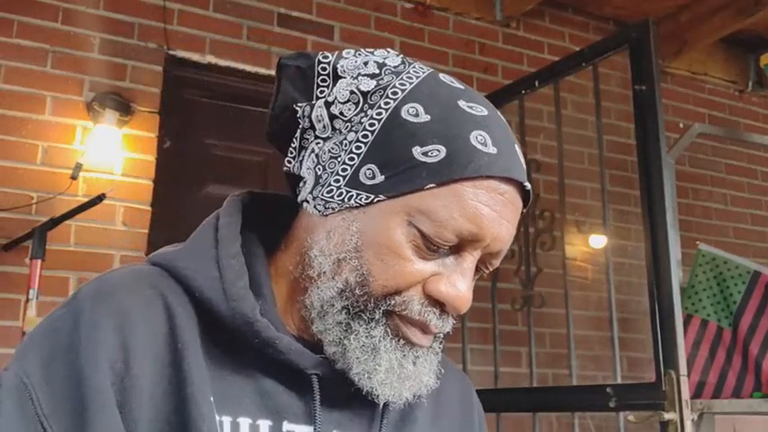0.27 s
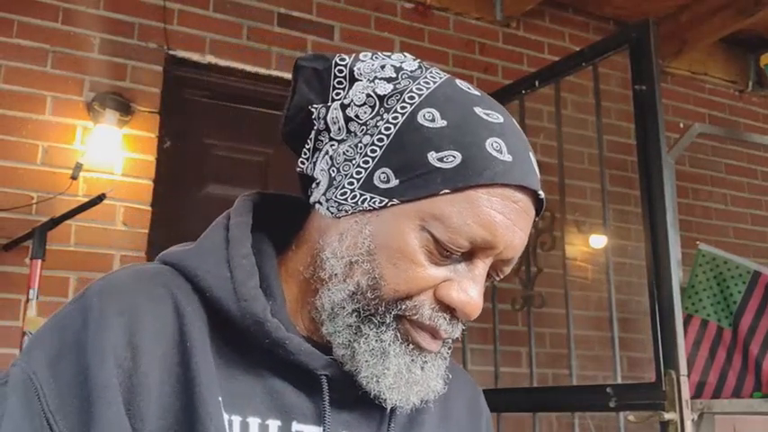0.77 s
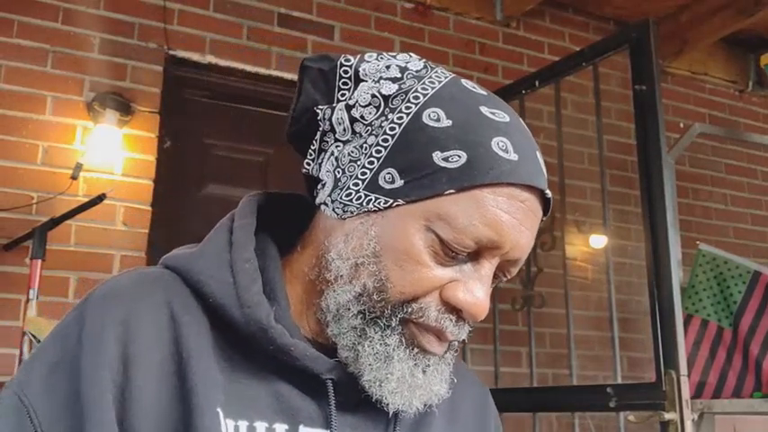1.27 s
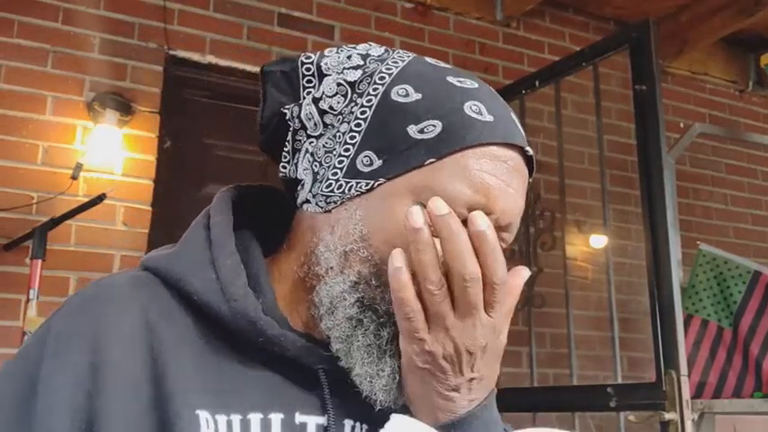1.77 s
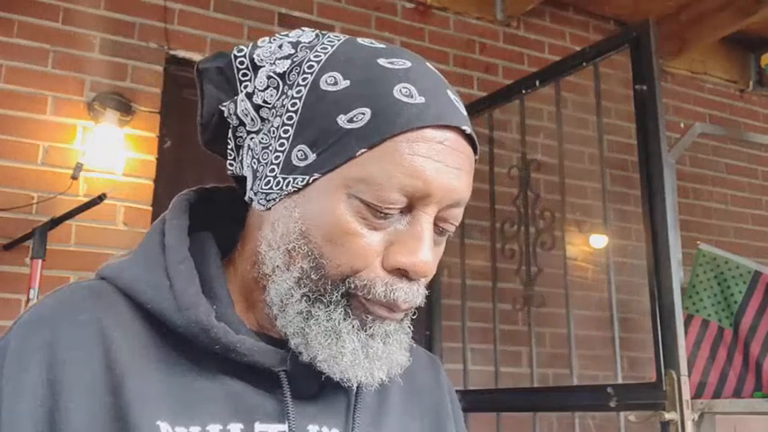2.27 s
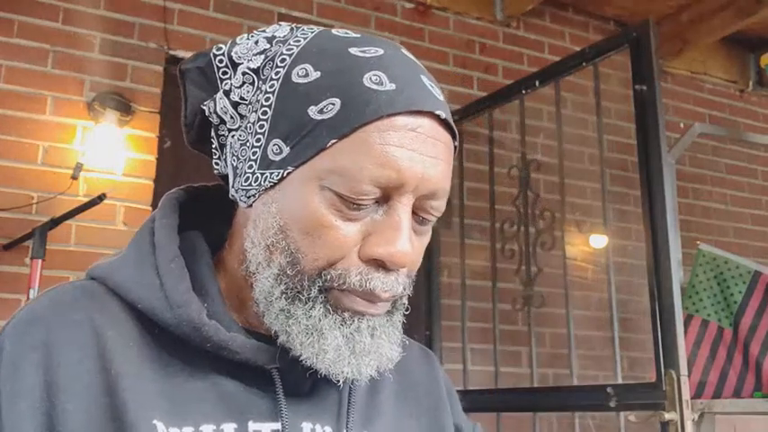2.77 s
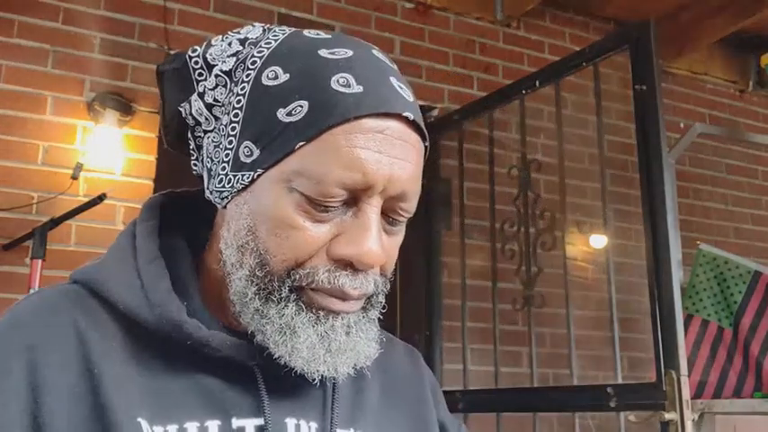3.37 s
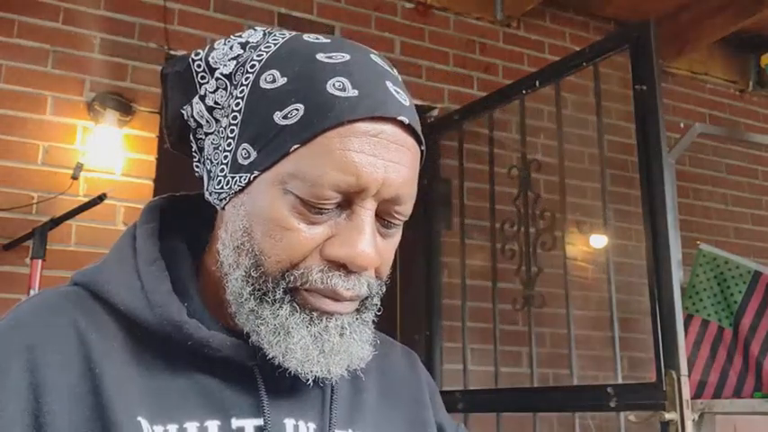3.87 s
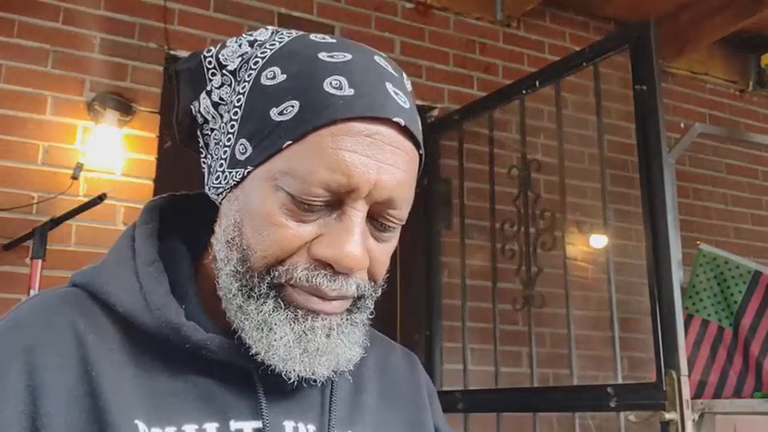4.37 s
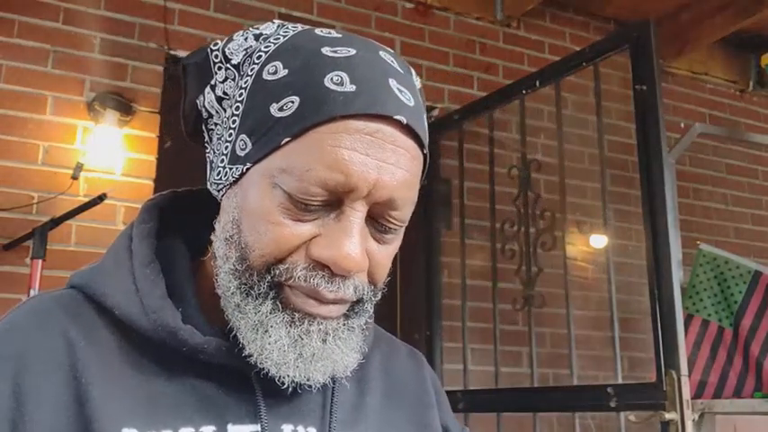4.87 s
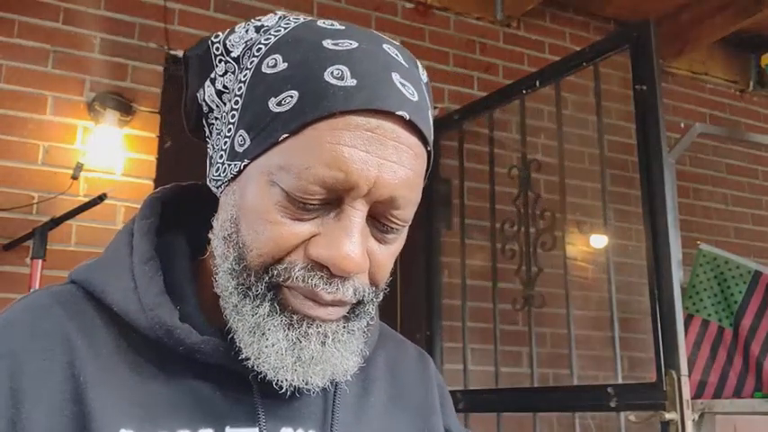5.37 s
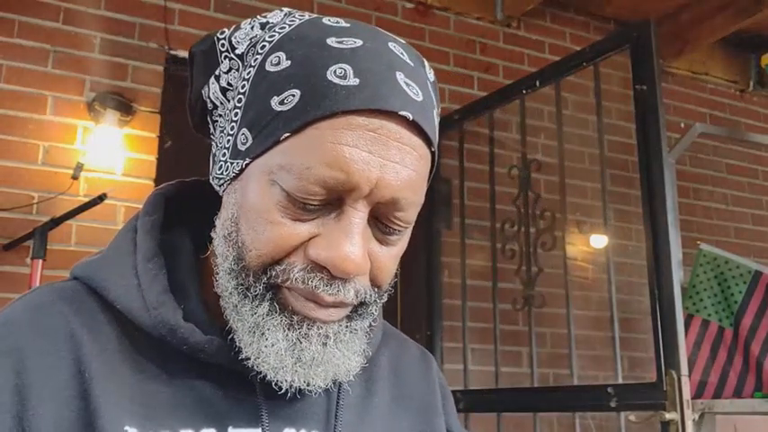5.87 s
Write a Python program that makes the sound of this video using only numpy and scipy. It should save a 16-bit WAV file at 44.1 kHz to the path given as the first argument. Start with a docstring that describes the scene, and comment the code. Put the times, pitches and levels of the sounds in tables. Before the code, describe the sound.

Close to a phone microphone on a brick porch, hard tablets clatter in a small plastic bottle in three quick bursts, then spill out in a loud scrabbling shake. After a pause, the bottle is snapped, knocked and thumped, hollow and plasticky, with one more firm tap cluster before it fades to faint contacts. A quiet traffic rumble and hiss lie underneath.

```python
"""Tablets are shaken about in a small plastic bottle and tipped into a hand; the bottle is then tapped and
knocked about. Single knocks, rough contacts that ring the bottle, stand out of showers of tiny collisions;
the air in the bottle hums along, and hard plastic adds damped pings and soft hollow thumps.
A brick porch adds a short echo of decaying noise, over a quiet outdoor hum of shaped noise and a faint whine;
a phone close by overloads on the sharpest clicks."""
import sys
import numpy as np
from scipy import signal
from scipy.fft import rfft, irfft
from scipy.io import wavfile
from scipy.ndimage import uniform_filter1d

SR = 44100
rng = np.random.default_rng(int(sys.argv[2]) if len(sys.argv) > 2 else 0)


def store_wav(level_fs):
    """Save 16-bit WAV to argv[1]."""
    pcm = np.round(np.clip(np.atleast_2d(level_fs), -1, 1) * 32767)
    wavfile.write(sys.argv[1], SR, pcm.T.astype(np.int16))


N = 269495
TIME = np.arange(N) / SR  # s

# resonances of bottle and tablets, in order thud, base, wall, neck, two of the tablets:
# pitch_hz, nominal width_hz, level_db in a knock, closed_change_db once the bottle is closed
RESONANCES = [(434, 443, -2, 3.5), (1011, 225, -7, -3), (1596, 703, -0.5, 1.5), (2887, 334, -3.5, -3.5),
              (4480, 890, 0.5, 1), (6000, 1310, 1, 1.5)]
# single knocks of tablets and bottle: start_s, level_db, hardness (0 a padded thud, 1 tablet on tablet)
KNOCK_EVENTS = [(0.0893, -22, 1.2), (.094, -19, 1.2), (0.1033, -7, 1.02), (0.1165, -12.5, 0.81),
                (0.1193, -12, 0.83), (.1273, -12, 1), (.151, -16.5, 1.02), (0.1652, -16.5, .7),
                (0.2015, -25, 0.63), (.209, -27.5, 0.66), (0.3618, -45, 1.08), (0.55, -21.5, 1.21),
                (0.5643, -18, 0.84), (0.5704, -12, 0.87), (0.7214, -27, 0.86), (.737, -15.5, 0.98),
                (0.7482, -21.5, 0.72), (1.395, -20, .6), (1.4328, -9.5, .78), (1.4944, -20.5, 0.6),
                (1.512, -29, 0.81), (1.561, -25.5, 0.66), (1.6139, -25, 0.57), (1.6421, -12.5, 0.71),
                (1.7265, -30, 0.53), (1.7602, -40, 0.14), (1.813, -29, 0.72), (2.3594, -32.5, 0.061),
                (2.447, -35, 0.14), (2.7686, -14.5, 1.09), (2.7832, -14, 0.6), (2.8445, -43, 1),
                (2.883, -15, .95), (2.8915, -14.5, 0.9), (3.0111, -36, .95), (3.039, -14, 0.72),
                (3.197, -32, 0.23), (3.523, -29, 0.2), (3.564, -32.5, 0.32), (3.777, -35.5, 0.76),
                (4.126, -24.5, 0.96), (4.1403, -14, 0.39), (4.1541, -16, 0.49), (4.173, -19.5, 0.2),
                (4.3018, -33, 1.06), (4.3578, -24.5, .22), (4.584, -40.5, 0.34), (4.789, -44, 0.67),
                (5.0012, -38, 0.54), (5.3973, -28, 0.91), (5.411, -51, .5)]

# once the tablets are out the bottle is closed, and bare plastic adds more treble
CLOSED_S, CLOSED_TREBLE_DB = 2.2, 5
SNAP_HZ = 8500  # pitch that stands for the bright treble of a contact


def knocks(contact_s=.00065, soft_stretch=0.37, snap_db=-5.0):
    """Each knock is a brief rough contact; hardness and a random landing set how hard each resonance rings."""
    landing_spread_db = 1.5
    out, t = np.zeros(N), TIME[:SR // 30]
    attack = t < .004
    for start_s, level_db, hardness in KNOCK_EVENTS:
        push_s = contact_s * np.exp(soft_stretch * (1 - hardness))  # a softer contact lasts longer
        # the thin plastic gives way, so the force builds before it dies
        force = t / push_s * np.exp(-t / push_s)
        closed = start_s > CLOSED_S
        sound = np.zeros(len(t))
        for hz, width_hz, ring_db, closed_db in RESONANCES:
            contact = rng.standard_normal(len(t)) * force
            pitch_hz = hz * np.exp(.03 * rng.standard_normal())
            # a core and a wider skirt
            mode = ring(contact, pitch_hz, width_hz) + ring(contact, pitch_hz, 1.6 * width_hz)
            mode_db = ring_db + closed * closed_db + push_db(hardness, hz)
            mode_db += landing_spread_db * rng.standard_normal()
            sound += undb(mode_db) * mode / np.std(mode[attack])
        # the hard edge of a tablet adds a bright snap
        snap = fizz(rng.standard_normal(len(t)) * force)
        bright_db = snap_db + closed * CLOSED_TREBLE_DB + push_db(hardness, SNAP_HZ)
        sound += undb(bright_db) * snap / np.std(snap[attack])
        add(out, start_s - push_s, undb(level_db) * sound)  # the force peaks at start_s
    return out


def push_db(hardness, hz):
    """A contact pushes hardest at a pitch set by its hardness, and less for each octave away from it."""
    soft_hz, hard_hz = 424, 6900  # strongest pitch at hardness 0 and 1
    below_db_per_oct, above_db_per_oct = 8, 11
    octaves = np.log2(hz / soft_hz) - hardness * np.log2(hard_hz / soft_hz)
    return min(below_db_per_oct * octaves, -above_db_per_oct * octaves)


def slides(per_second=1600, spread_db=2.0, rub=0.25, thud_db=-10, thud_follow=0.94, base_db=-11,
           neck_db=-5, low_tablet_db=-8, high_tablet_db=-2, fizz_db=-8.5):
    """Tablets slide and fingers rub: showers of tiny random collisions, over a steady rub, swell and die away."""
    # tablets sliding, fingers rubbing on plastic: peak_s, fall_s, level_db, walls_db (share of the walls)
    slide_events = [(.002, 0.0093, -20, -10), (0.137, 0.084, -25, -2.5), (0.176, 0.068, -22.5, -7.5),
                    (.291, 0.048, -32, -16.5), (.584, 0.038, -23.5, -9), (0.611, 0.037, -23.5, -10.5),
                    (0.733, 0.045, -22, -7.5), (1.377, 0.11, -27.5, -21), (1.417, 0.032, -22.5, -12.5),
                    (1.463, 0.087, -19, -21), (1.502, 0.032, -17, -8.5), (1.577, 0.14, -30.5, -5),
                    (1.665, 0.028, -30.5, -5), (2.795, .028, -30, 2), (2.88, 0.019, -27, -6),
                    (2.909, 0.029, -23, -8.5), (2.945, 0.043, -28, -10.5), (3.04, 0.026, -26, -1.5),
                    (3.18, 0.41, -47, -11), (3.509, 0.14, -43.5, -7), (3.788, 0.02, -39, -7.5),
                    (3.989, .12, -34.5, -21), (4.109, .045, -21, -11.5), (4.136, 0.033, -18.5, -5),
                    (4.175, .025, -46, -11), (4.314, 0.028, -27.5, -29), (4.369, 0.022, -42.5, 1.5),
                    (4.491, 0.34, -47, -13.5), (4.61, 0.12, -45, -10), (4.765, 0.03, -49, -4),
                    (4.919, 0.03, -49.5, -7.5), (5.04, .08, -51.5, -10), (5.422, 0.013, -39, -16)]
    out = np.zeros(N)
    for peak_s, fall_s, level_db, walls_db in slide_events:
        rise_s = .028 * (fall_s / .05) ** .4  # longer slides build more slowly
        start_s = max(peak_s - 2 * rise_s, 0)
        t = start_s - peak_s + TIME[:SR * 3 // 4]
        # the thud follows the walls; the neck rings with both the walls and the tablets that strike it
        shares_db = [thud_db + thud_follow * walls_db, walls_db + base_db, walls_db,
                     walls_db / 2 + neck_db, low_tablet_db, high_tablet_db]
        hits = rng.random(len(t)) < per_second / SR
        sizes = hits * undb(spread_db * np.minimum(rng.exponential(size=len(t)), 3))
        grains = (sizes + rub) * rng.standard_normal(len(t))
        closed = peak_s > CLOSED_S
        treble_gain = undb(fizz_db + closed * CLOSED_TREBLE_DB)
        sound = treble_gain * fizz(grains) * swell(t, rise_s, fall_s, SNAP_HZ)
        for (hz, width_hz, _, closed_db), share_db in zip(RESONANCES, shares_db):
            mode = unit(ring(grains, hz, 1.266 * width_hz))
            sound += undb(share_db + closed * closed_db) * mode * swell(t, rise_s, fall_s, hz)
        add(out, start_s, undb(level_db) * sound)
    return out


def swell(t, rise_s, fall_s, hz):
    """A slide's level at one pitch: up 20 dB over the rise, down 20 dB over the fall, the treble sooner."""
    fall_s = fall_s * (3000 / hz) ** 0.16
    return undb(-20 * np.where(t < 0, (t / rise_s) ** 2, t / fall_s))


def bottle_air(rattle, ring_s=.018, wander=0.0087):
    """The rattle rings the air in the bottle: one pure wandering low note, and standing waves along the tube."""
    # spells in which the air sounds: start_s, end_s, pitch_hz of the lowest note, its air_db, tube_db
    air_spells = [(0.096, 0.243, 519.5, -47, -39), (.56, 0.792, 520, -52.5, -65),
                  (1.378, 1.538, 576.5, -41.5, -34), (1.561, 1.734, 570, -55, -33.5),
                  (2.759, 2.793, 578, -33, -54.5), (2.884, 2.971, 558, -33, -54.5)]
    # standing waves along the bottle: pitch_hz, width_hz, level_db against each other
    tube_modes = [(1342, 48, 8), (2105, 75, 2.5), (2833, 116, -8.5), (5010, 160, -14)]
    out = np.zeros(N)
    for start_s, end_s, hz, air_db, tube_db in air_spells:
        shaken = rattle[int(start_s * SR):int(end_s * SR)]
        drive = np.pad(np.tanh(shaken / 0.14), (0, SR // 4))
        # the lowest note stores the energy of the collisions and lets it go slowly
        stored = signal.lfilter([1], [1, -np.exp(-1 / (ring_s * SR))], np.abs(drive))
        pitch_hz = hz * (1 + wander * walk(60)[:len(drive)])
        air = stored * np.sin(2 * np.pi * np.cumsum(pitch_hz) / SR)
        tube = np.zeros(len(drive))
        for mode_hz, width_hz, mode_db in tube_modes:
            tube += undb(mode_db) * resonate(resonate(drive, mode_hz, width_hz), mode_hz, 450)
        for sound, level_db in ((air, air_db), (tube, tube_db)):
            add(out, start_s, undb(level_db) * sound / np.std(sound[:len(shaken)]))
    return out


def pings(grip_db=-14, grip_shift=.015):
    """Hard plastic rings on: single pings, the high ones briefer, and the whole shell at each knock."""
    # knocks that leave a clear ping, its pitch set by the spot and the grip: start_s, peak_db, pitch_hz
    ping_events = [(1.757, -34.5, 1223), (1.813, -20.5, 4010), (1.83, -41.5, 1130), (2.783, -10, 1610),
                   (3.038, -10.5, 5970), (3.196, -38.5, 2760), (3.523, -30, 2864), (3.524, -32, 786),
                   (3.56, -26, 1120), (4.141, -13.5, 877), (4.153, -18, 757), (4.173, -19.5, 2420),
                   (4.172, -20.5, 2755), (4.302, -13, 6060), (4.302, -28, 2340), (4.358, -22.5, 710),
                   (4.358, -26.5, 1280), (5, -24.5, 1810), (5.397, -33, 2190), (5.397, -30, 4880)]
    # what every knock rings in the shell: pitch_hz, level_db against the knock, t60_s
    shell_modes = [(1398, 4.5, 0.078), (2796, 2, .08), (2800, -7, 0.24)]
    # while the bottle is tipped and held loosely its shell rings freely; a firm grip damps it: start_s, end_s
    tipped_span = (1.38, 1.74)
    rows = []
    for start_s, peak_db, hz in ping_events:
        t60_s = 0.037 * (2010 / hz) ** 0.17
        rows.append((start_s, peak_db, hz, t60_s))
    for start_s, level_db, hardness in KNOCK_EVENTS:
        held_db = 0 if tipped_span[0] < start_s < tipped_span[1] else grip_db
        shift = 1 + grip_shift * rng.standard_normal()  # the pitch shifts with the grip
        for hz, mode_db, t60_s in shell_modes:
            shell_db = level_db + held_db + mode_db + push_db(hardness, hz)
            rows.append((start_s, shell_db, hz * shift, t60_s))
    return notes(rows, push_s=0.00024, sag=0.012, rough=0.48)


def thumps(t60_s=0.071, firm_db=-24, stretch_per_db=0.09):
    """The hand pushes softly on the hollow bottle; a light touch lets it ring longer than a firm one."""
    # soft hollow thumps of the bottle in the hand: start_s, peak_db, pitch_hz
    thump_events = [(2.359, -28, 292), (2.369, -26.5, 229), (2.370, -32, 407), (2.448, -36.5, 307),
                    (3.010, -29, 456), (3.039, -8, 454), (3.07, -25, 339), (3.167, -33, 371),
                    (3.194, -23, 315), (3.258, -32, 245), (3.341, -35, 309), (3.465, -29.5, 325),
                    (3.491, -23.5, 298), (3.521, -18, 290), (3.533, -18, 305), (3.563, -26, 355),
                    (3.584, -34.5, 357), (3.777, -32, 230), (4.139, -16, 282), (4.154, -20, 154),
                    (5.406, -31.5, 157)]
    rows = []
    for start_s, peak_db, hz in thump_events:
        rows.append((start_s, peak_db, hz, t60_s * np.exp(stretch_per_db * (firm_db - peak_db))))
    return notes(rows, push_s=0.0018, sag=0.023, rough=0.41)


def notes(rows, push_s, sag, rough):
    """Damped notes of the gripped plastic, a sine plus rough noise; each sags a little as the fingers settle."""
    out, t = np.zeros(N), TIME[:SR // 5]
    for start_s, level_db, hz, t60_s in rows:
        pitch_hz = hz * (1 + sag * (np.exp(-t / 0.007) - .5))
        tone = np.sin(2 * np.pi * np.cumsum(pitch_hz) / SR)
        flex = unit(ring(rng.standard_normal(len(t)), hz, 290))
        envelope = (1 - np.exp(-t / push_s)) * np.exp(-np.log(1000) * t / t60_s)
        add(out, start_s, undb(level_db) * envelope * (tone + rough * flex))
    return out


def porch(x, wet_db, build_s=0.0008, t60_s=0.12):
    """Close brick walls, floor and roof return a dense, short echo: noise that builds fast and decays."""
    t = TIME[:SR // 3]
    build = 1 - np.exp(-(t / build_s) ** 2)
    echo = rng.standard_normal(len(t)) * build * np.exp(-np.log(1000) * t / t60_s)
    return x + undb(wet_db) * signal.fftconvolve(x, echo / np.sqrt(np.sum(echo ** 2)))[:N]


def outdoors(level_db=-46.5, waver_db=1.15):
    """A wavering rumble of distant traffic and an even hiss, both shaped noise, and a faint drifting whine."""
    # colour of the background: pitch_hz, density_db (per Hz, relative)
    background_colour = [(30, -53.5), (48, -32.5), (64, -15.5), (85, 1), (125, 1.5), (180, -4.5),
                         (260, -10.5), (400, -16.5), (700, -17), (1200, -24.5), (3000, -24.5),
                         (4800, -24.5), (6400, -20), (7600, -26)]
    # slow level change of the background: time_s, change_db
    background_swell = [(0, 0.5), (1.2, -1.8), (4.3, 0.1), (6.1, -5)]
    # a faint far-off whine: time_s, pitch_hz, peak level_db
    whine_track = [(1.9, 706, -70), (2.201, 735, -55.5), (2.6, 752, -63.5), (3.3, 752, -60),
                   (3.949, 753, -57.5), (4.3, 755, -63)]
    hz = np.maximum(np.arange(N // 2 + 1) * SR / N, 1)
    points_hz, points_db = np.transpose(background_colour)
    colour_db = np.interp(np.log(hz), np.log(points_hz), points_db)
    noise = irfft(rfft(rng.standard_normal(N)) * undb(colour_db), N)
    rumble = signal.sosfiltfilt(signal.butter(2, 400, fs=SR, output='sos'), noise)
    background = unit(noise + rumble * (undb(waver_db * walk(3.7)) - 1))  # only the rumble wavers
    swell_db = np.interp(TIME, *np.transpose(background_swell))
    time_s, whine_hz, whine_db = np.transpose(whine_track)
    pitch_hz = np.interp(TIME, time_s, whine_hz) * (1 + 0.0099 * walk(22))
    whine = undb(np.interp(TIME, time_s, whine_db)) * np.sin(2 * np.pi * np.cumsum(pitch_hz) / SR)
    return background * undb(level_db + swell_db) + whine


def undb(db):
    """Decibels to gain."""
    return 10 ** (np.asarray(db) / 20)


def unit(x):
    """Scale to rms 1."""
    return x / np.sqrt(np.mean(x ** 2) + 1e-20)


def add(track, start_s, sound):
    """Mix a sound into a track at a time."""
    i = max(int(start_s * SR), 0)
    track[i:i + len(sound)] += sound[:max(N - i, 0)]


def resonate(x, hz, width_hz):
    """One resonance, gain 1 at its centre."""
    return signal.lfilter(*signal.iirpeak(hz, hz / width_hz, fs=SR), x)


def ring(x, hz, width_hz):
    """A pair of coupled resonances: a broad top with steep sides."""
    half = np.exp(width_hz / hz / 2)
    return signal.sosfilt(signal.butter(2, [hz / half, hz * half], 'bandpass', fs=SR, output='sos'), x)


def brightest(x, edge_hz=7500):
    """The treble above the tablet resonances."""
    return signal.sosfilt(signal.butter(4, edge_hz, 'highpass', fs=SR, output='sos'), x)


def fizz(x, top_hz=11500):
    """The treble of small collisions, which thins out towards the top, at rms 1."""
    return unit(signal.sosfilt(signal.butter(2, top_hz, fs=SR, output='sos'), brightest(x)))


def walk(rate):
    """Smooth random drift at rms 1, from `rate` random steps a second."""
    k = int(SR / rate)
    steps = np.repeat(rng.standard_normal(N // k + 1), k)
    return unit(uniform_filter1d(steps, k)[:N])


def scene():
    """Rattle, bottle air, pings and thumps on the porch, over the outdoors."""
    rattle = porch(knocks(), wet_db=-3.5) + porch(slides(), wet_db=-7.0)
    plastic = porch(pings() + thumps(), wet_db=-7.5)
    return (rattle + bottle_air(rattle) + plastic + outdoors())[None]


def record(dry, knee_hz=7050, treble_db=-19, top_hz=15900):
    """The phone passes little above its treble knee, clips the sharpest peaks and cuts the top."""
    body = signal.sosfiltfilt(signal.butter(10, knee_hz, fs=SR, output='sos'), dry)
    clipped = np.clip(body + undb(treble_db) * (dry - body), -1, 1)
    return signal.sosfilt(signal.ellip(8, .2, 70, top_hz, fs=SR, output='sos'), clipped)


dry = scene()
out = record(dry)
store_wav(out)
```